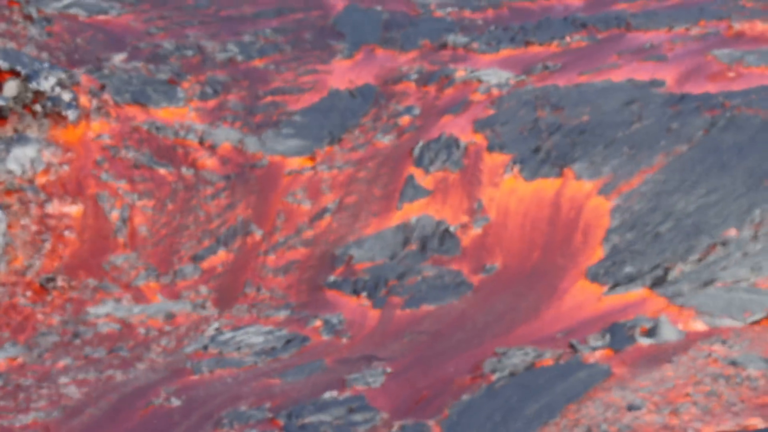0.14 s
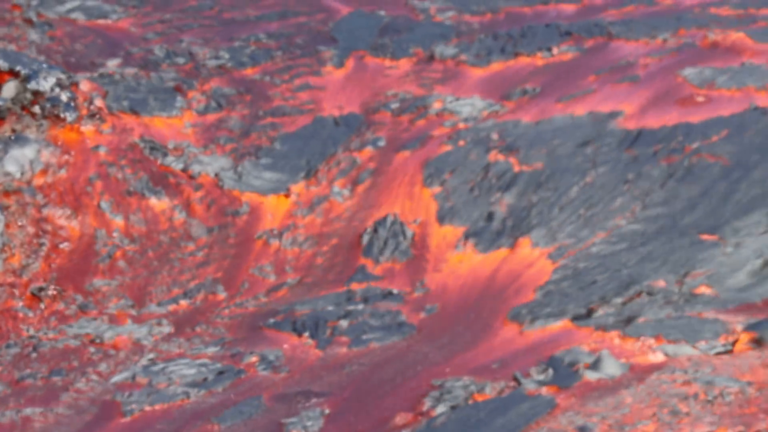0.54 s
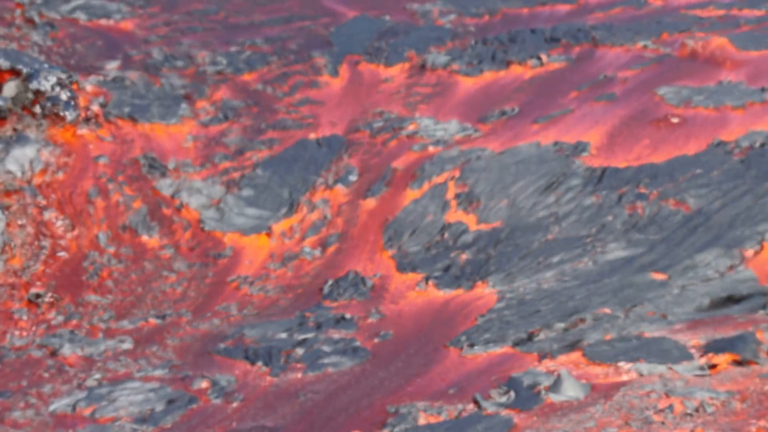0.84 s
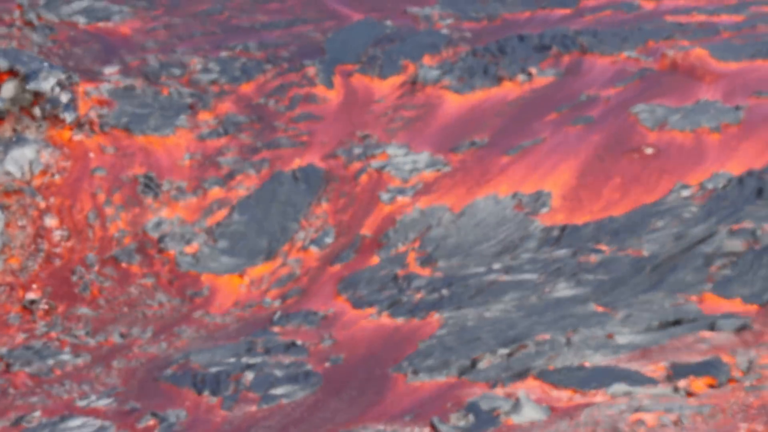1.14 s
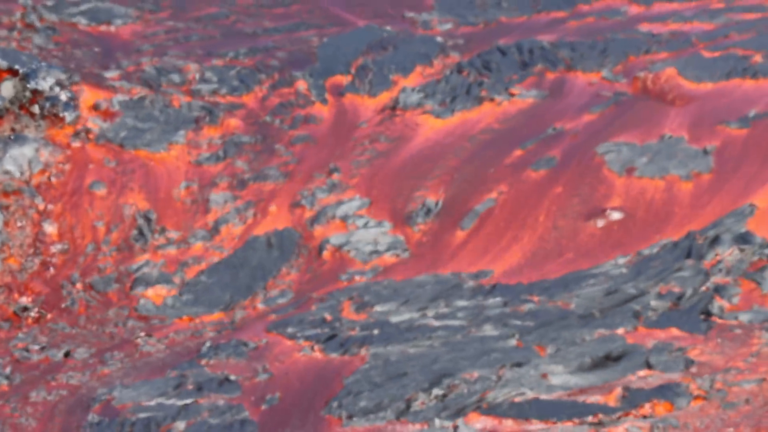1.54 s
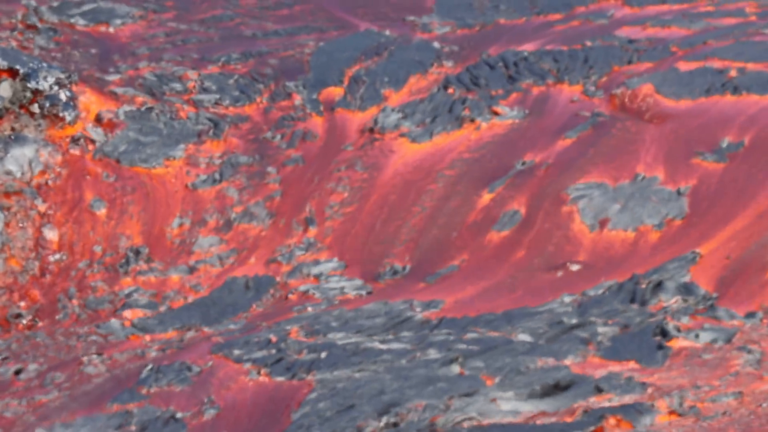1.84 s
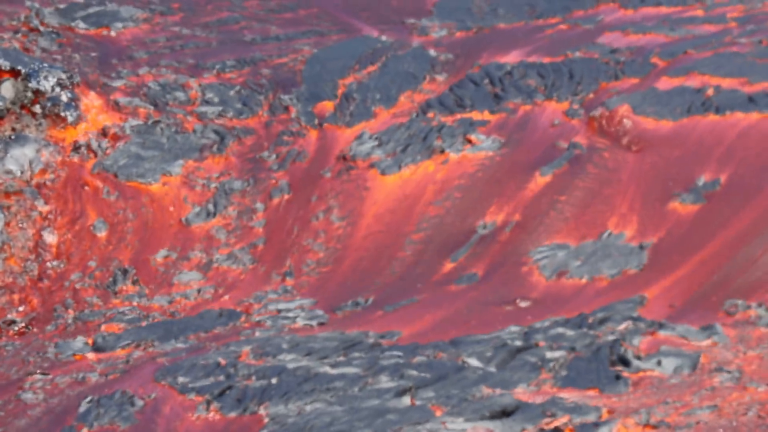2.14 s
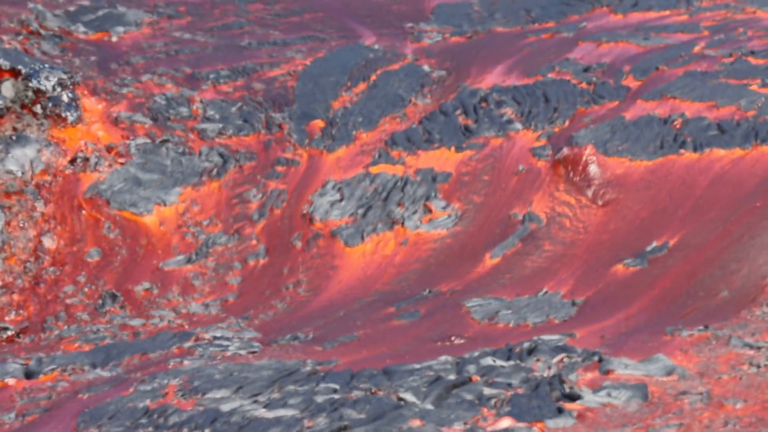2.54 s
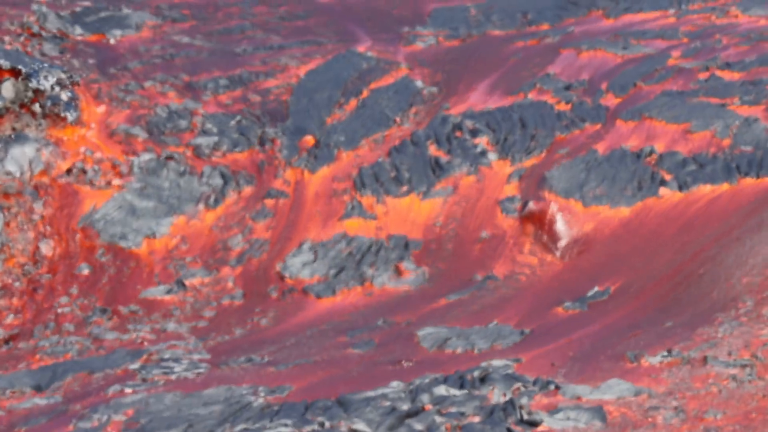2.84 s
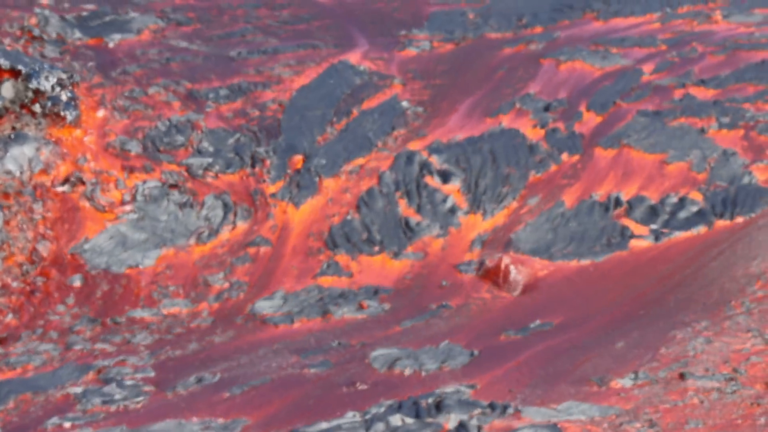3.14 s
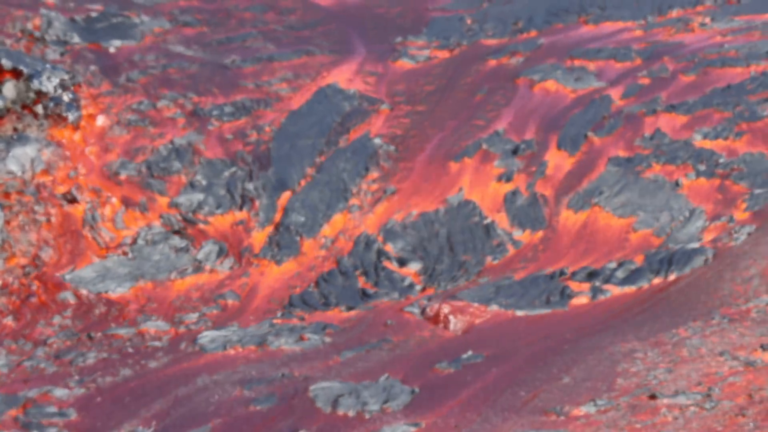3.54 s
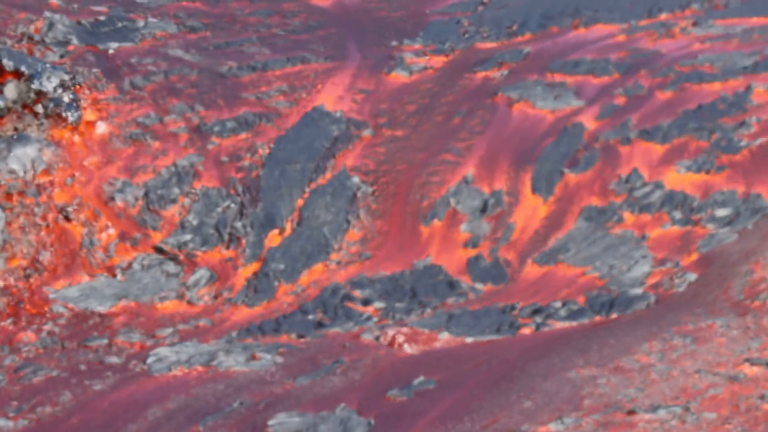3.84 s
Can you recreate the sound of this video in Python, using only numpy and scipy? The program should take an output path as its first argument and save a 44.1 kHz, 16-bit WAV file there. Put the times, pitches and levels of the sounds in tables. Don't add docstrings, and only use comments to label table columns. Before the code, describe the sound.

Gusty low wind noise dominates close to the microphone, rising and falling unevenly. Behind it molten lava roars quietly with airy hiss, while cooling crust clicks and clinks, mostly in the first two seconds, outdoors.

```python
import sys
import numpy as np
from scipy import signal
from scipy.fft import rfft, irfft
from scipy.io import wavfile
from scipy.ndimage import uniform_filter1d

SR = 44100
rng = np.random.default_rng(int(sys.argv[2]) if len(sys.argv) > 2 else 0)


def waveform_to_disk(signal):
    frames = np.transpose(np.atleast_2d(signal))
    scaled = np.clip(frames, -1, 1) * 32767
    samples = np.round(scaled).astype(np.int16)
    wavfile.write(sys.argv[1], SR, samples)


def volts(x):
    e = np.asarray(x, float) / 20
    return 10 ** e


N = 176400

# time in seconds, level in dB, extra brightness in dB.
GUSTS = [(0, -43.5, 2), (.1, -38, -4.5), (.27, -41.5, -9), (.42, -35, -3.5), (.48, -28, -4.5),
         (.62, -27, -2.5), (.86, -32, -2.5), (1, -38, 0.5), (1.26, -29.5, -2.5), (1.55, -29, 1.5),
         (2.07, -34.5, 2.5), (2.5, -35.5, 5), (2.68, -27, 1.5), (3.38, -28.5, 0.5), (3.46, -31.5, -1.5),
         (3.62, -39, 5), (3.72, -44, 0.5), (4, -28.5, -3.5)]
# middle in seconds, strength in dB, length in seconds.
EDDIES = [(0.574, 6.5, 0.027), (0.482, 2, 0.043), (0.79, -1.5, 0.049), (1.3, -1, 0.026), (1.274, 2.5, 0.05),
          (1.3, 2.5, 0.032), (2.125, 5, 0.021), (2.33, 3, 0.037), (2.57, 3, 0.013), (3.3, 1, 0.038),
          (2.845, 4.5, 0.026), (3.6, 0.5, 0.034), (1.6, 0, 0.14), (3.735, -3.5, 0.03), (3.77, 4, 0.03),
          (3.69, -7, 0.027), (3.62, 3.5, .025), (3.5, 5.5, 0.029), (3.885, -5.5, 0.027),
          (3.51, -3.5, 0.028), (1.2, -1.5, 0.067), (2.25, -1.5, 0.042), (1.94, -2, 0.013),
          (0.966, -3.5, 0.041), (3.4, -0.5, 0.04), (3.66, -7, 0.042), (3.5, 5.5, 0.022), (.285, -16, 0.012)]
# frequency in Hz, level in dB per Hz.
WIND_COLOUR = [(18, -9.5), (35, -1), (90, -2), (200, -7), (500, -18), (1000, -29.5), (2000, -39),
               (5000, -57)]
# frequency in Hz, share (1 = fully).
GUST_SHARE = [(30, 0.65), (150, 1.05), (500, 1.14), (1500, 1.13), (5000, 1.13)]
# middle in seconds, peak in dB, pitch in Hz, length in seconds.
THUMPS = [(0.499, -25, 54.6, 0.017), (1.169, -27, 52, 0.029), (3.405, -25.5, 72.4, 0.017),
          (3.848, -27.5, 50, .008), (3.912, -25, 40, 0.0074), (0.563, -14.5, 74.6, 0.0056),
          (1.298, -22, 44.4, 0.011), (2.125, -33, 78.6, 0.015), (2.698, -19, 67, 0.0074),
          (2.723, -22.5, 125, 0.013), (2.842, -15.5, 59.7, 0.011), (2.87, -15.5, 74.6, 0.0065),
          (2.955, -17, 52.4, 0.016), (3.01, -14, 91, 0.0018), (3.098, -18.5, 109, 0.0057),
          (3.175, -22, 60, 0.013), (3.97, -22.5, 51.7, 0.034)]
# frequency in Hz, level in dB per Hz.
ROAR_COLOUR = [(40, -9), (200, -0.5), (700, -4.5), (1500, -8.5), (3000, -15.5), (6000, -25), (9000, -30),
               (15500, -31.5)]
# time in seconds, level in dB.
SURGES = [(0, 0.5), (.25, -1), (.5, 0), (.8, 0), (1.02, 2.5), (1.2, 1.5), (1.45, 0.5), (1.68, 1.5),
          (2.05, -0.5), (2.3, 0.5), (2.55, 0.5), (2.75, -0.5), (3.1, 1.5), (3.45, -0.5), (3.65, 0),
          (3.85, -1.5), (4, -2)]
# start in seconds, peak in dB, pitch in Hz, time to fall 60 dB in seconds.
TICKS = [(.174, -53, 7100, .008), (.191, -51, 6260, .006), (.1915, -54, 9500, .005), (.205, -56, 8500, .01),
         (.310, -56, 7000, .004), (.316, -50, 5000, 0.0067), (.933, -56, 5700, .006),
         (.857, -56, 6000, .004), (.818, -55, 6300, .006), (1.252, -58, 5400, .006),
         (1.2812, -53, 9000, .003), (1.2818, -51, 11300, .003), (1.282, -52, 14500, .006),
         (1.6, -50, 4500, .006), (1.2835, -41.5, 6920, 0.0073), (1.72, -52, 3800, .006),
         (1.83, -57, 9000, .006), (2.280, -55, 6000, 0.0086), (2.281, -55, 12200, .006),
         (2.34, -54, 5500, .006), (2.395, -54, 9000, .003), (2.413, -51, 5950, .006),
         (2.51, -54, 6100, .006), (2.528, -61, 12500, .003), (3.415, -55, 8600, .005),
         (3.53, -55, 12500, .003), (3.547, -45, 7500, .003), (3.632, -57, 6560, .004),
         (3.763, -54, 8000, .005)]
# start in seconds, peak in dB, pitch in Hz, 60 dB fall in seconds.
KNOCKS = [(.293, -38, 2200, 0.013), (.293, -42, 1250, .012), (.18, -42, 1250, .02),
          (.309, -38, 2250, 0.013), (0.476, -52, 2620, .02), (1.258, -34, 1800, 0.014),
          (1.675, -31, 1400, 0.01), (1.675, -27, 2000, 0.0067), (1.952, -40, 1200, 0.0092),
          (.9175, -46, 7500, .006), (.896, -49, 6680, .014), (1.657, -51, 10200, .03),
          (1.68, -55, 11000, .025), (.2, -46, 2750, .01), (.573, -41, 2160, .012), (.957, -43, 2300, .015),
          (.957, -46, 2950, .012), (1.01, -48, 4800, .012), (1.044, -39.5, 2850, .015),
          (1.045, -39, 1500, .015), (1.062, -46, 2600, .02), (1.183, -42, 2700, .015),
          (2.444, -40, 2500, .012), (2.446, -44, 3520, 0.011), (2.559, -43, 2890, .014),
          (2.559, -47, 4400, .01), (3.52, -47, 2900, .02)]
# pitch in Hz, peak in dB, time to fall 60 dB in seconds.
FLAKE_NOTES = [(4500, -28.5, 0.0095), (4930, -30.5, 0.0088), (5780, -33, 0.0078)]
# start in seconds, peak in dB.
CLINKS = [(.807, -50), (.810, -39), (.813, -42), (.818, -48), (.843, -47), (0.857, -44), (.859, -42),
          (.868, -46), (.871, -42.5), (0.874, -45), (.879, -52)]
# pitch in Hz, level in dB, time to fall 60 dB in seconds.
PLATE_NOTES = [(2655, -5.5, 0.035), (3310, -13, 0.14), (3360, 0, 0.021), (4200, -5.5, 0.017),
               (5700, -22, .015), (8000, -28, .015)]
# pitch in Hz, level in dB, time to fall 60 dB in seconds.
CREAK_NOTES = [(5950, -7, .015), (7760, -6, .004), (9600, -6, .008), (12200, -9, .004), (4800, -9, .006),
               (13800, -9, .004)]
# start in seconds, peak in dB.
SNAPS = [(.175, -58), (.192, -60), (.3105, -58), (.8962, -47), (1.2815, -45), (1.6572, -55), (1.673, -56),
         (1.284, -54), (1.782, -57), (2.281, -55), (2.395, -56), (2.528, -57), (3.53, -57), (3.547, -53),
         (3.632, -58), (3.795, -53)]
# pitch in Hz, average (rms) level in dB.
WHINE = [(14805, -97), (14865, -98)]

SHARED_RATE, NEAR_RATE, OWN_RATE = 35, 24, 16
PLATE_CONTACT_CYCLES = 8


def wind():
    t = np.arange(N) / SR
    gust_s, gust_db, brightness_db = np.array(GUSTS).T
    gust = np.interp(t, gust_s, gust_db) + 29.5
    for s, db, length_s in EDDIES:
        gust = gust + db * np.exp(-2 * ((t - s) / length_s) ** 2)
    gust = gust + 1.0 * walk(SHARED_RATE)
    bright = np.interp(t, gust_s, brightness_db)
    colour = WIND_COLOUR + [(9000, WIND_COLOUR[-1][1] - 20)]
    out = np.zeros(N)
    near = walk(NEAR_RATE)
    for hz, noise in bands(colour, 26.2, 6400, whistle_db=7):
        near = .7 * near + .7 * walk(NEAR_RATE)
        level = on_log(GUST_SHARE, hz) * gust
        level = level + bright * np.clip(np.log2(hz / 150) / 2, 0, 1)
        level = level + 1.3 * near + 1.0 * walk(OWN_RATE)
        out += even(noise, hz) * volts(level)
    return volts(-30) * out


def walk(rate):
    hold = int(SR / rate)
    steps = np.repeat(rng.standard_normal(N // hold + 1), hold)
    smooth = uniform_filter1d(uniform_filter1d(steps, hold), hold)
    return 0.95 * smooth[:N]


def on_log(table, hz):
    table_hz, value = np.array(table).T
    return np.interp(np.log(hz), np.log(table_hz), value)


def bands(colour, lo_hz, hi_hz, whistle_db=0):
    f = np.maximum(np.arange(N // 2 + 1) * SR / N, 1)
    spec = rfft(rng.standard_normal(N)) * volts(on_log(colour, f)) * (f > 12)
    spec = spec * volts(whistle_db * np.exp(-((f - 424) / 9) ** 2))
    spec = spec / np.sqrt(np.mean(irfft(spec, N) ** 2))
    steps = np.arange(np.round(2 * np.log2(hi_hz / lo_hz)) + 1)
    place = np.clip(2 * np.log2(f / lo_hz), 0, steps[-1])
    slices = []
    for k in steps:
        share = np.cos(np.pi / 2 * np.clip(place - k, -1, 1)) ** 2
        slices.append((lo_hz * 2 ** (k / 2), irfft(spec * share, N)))
    return slices


def even(x, hz):
    power = uniform_filter1d(x ** 2, int(12 * SR / hz))
    return x * (np.mean(power) / power) ** (.6 / 2)


def thumps():
    t = np.arange(N) / SR
    out = np.zeros(N)
    for s, db, hz, length_s in THUMPS:
        push = np.exp(-((t - s) / length_s) ** 2)
        out += volts(db) * push * np.cos(2 * np.pi * hz * (t - s) + 2 * np.pi * rng.random())
    return out


def lava():
    flicker_db = .9
    level = np.interp(np.arange(N) / SR, *np.array(SURGES).T)
    level = level + .3 * walk(1.5) + flicker_db * walk(SHARED_RATE)
    out = np.zeros(N)
    for _, noise in bands(ROAR_COLOUR, 56, 15360):
        out += noise * volts(level + flicker_db * walk(NEAR_RATE))
    return volts(-50.5) * out


def crust():
    return knocks() + plate() + flake() + ticks() + creak() + crackle() + snaps()


def knocks():
    out = np.zeros(N)
    for s, db, hz, t60 in KNOCKS:
        add(out, s, volts(db) * ring(hz, t60))
    return out


def plate():
    out = np.zeros(N)
    for s, db in CLINKS:
        for hz, note_db, t60 in PLATE_NOTES:
            level = db + note_db + 2.0 * rng.standard_normal()
            add(out, s, volts(level) * ring(hz, t60, PLATE_CONTACT_CYCLES))
    stuck_s, fade_s = .881, .004
    return out * np.exp(-np.maximum(np.arange(N) / SR - stuck_s, 0) / fade_s)


def flake():
    out = np.zeros(N)
    for hz, db, t60 in FLAKE_NOTES:
        add(out, .9162, volts(db) * ring(hz, t60, PLATE_CONTACT_CYCLES))
    return out


def ticks():
    out = np.zeros(N)
    for s, db, hz, t60 in TICKS:
        add(out, s, volts(db + 4.5) * tick(hz, t60, snap_db=-27))
    return out


def creak():
    start_s, length_s, rate, fade_db_per_s = 1.657, .032, 690, 200
    out = np.zeros(N)
    for k in range(int(length_s * rate) + 1):
        jitter = rng.standard_normal()
        for hz, note_db, t60 in CREAK_NOTES:
            level = -50 + note_db + 4.0 * rng.standard_normal() - fade_db_per_s * k / rate
            add(out, start_s + (k + .3 * jitter) / rate, volts(level) * ring(hz * (1 + .015 * jitter), t60))
    return out


def crackle(count=900):
    lo_hz, hi_hz = 2380, 13100
    out = np.zeros(N)
    for moment, pitch, strength in rng.random((count, 3)):
        hz = lo_hz * (hi_hz / lo_hz) ** pitch
        level = min(-72 - 4 * np.log(1 - strength), -58)
        x = np.sqrt(5000 / hz) * tick(hz, .006, snap_db=-7)
        add(out, moment * N / SR, volts(level) * x)
    return out


def snaps():
    out = np.zeros(N)
    for s, db in SNAPS:
        add(out, s, volts(db) * snap())
    return out


def tick(hz, t60, snap_db):
    x = ring(hz, t60) + volts(-6) * ring(hz * 1.26, t60)
    burst = snap()[:len(x)]
    x[:len(burst)] += volts(snap_db) * burst
    return x


def ring(hz, t60, contact_cycles=3):
    t = np.arange(int(t60 * SR) + 60) / SR
    swell = np.sin(np.pi / 2 * np.clip(t * hz / contact_cycles, 0, 1)) ** 2
    return swell * np.sin(2 * np.pi * min(hz, 15000) * t) * np.exp(-np.log(1000) * t / t60)


def snap():
    t = np.arange(120) / SR
    bright_noise = np.diff(rng.standard_normal(len(t) + 1))
    return bright_noise * np.exp(-t / 0.00049) / 2


def add(out, s, x):
    i = int(s * SR)
    out[i:i + len(x)] += x[:N - i]


def whine():
    t = np.arange(N) / SR
    return sum(np.sqrt(2) * volts(db) * np.sin(2 * np.pi * hz * t) for hz, db in WHINE)


def scene():
    return (wind() + thumps() + lava() + crust() + whine())[None]


def top_cut(x):
    return signal.sosfilt(signal.butter(12, 15690, fs=SR, output="sos"), x)


def record(dry):
    soft = signal.sosfilt(signal.butter(4, 15100, fs=SR, output="sos"), dry)
    mix = signal.sosfilt(signal.ellip(10, .3, 60, 15680, fs=SR, output="sos"), soft)
    return top_cut(mix)


dry = scene()
out = record(dry)
waveform_to_disk(out)
```